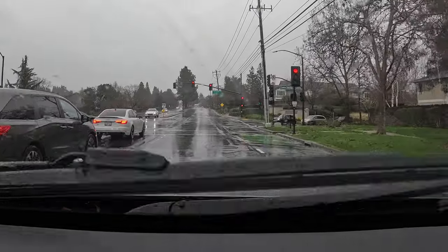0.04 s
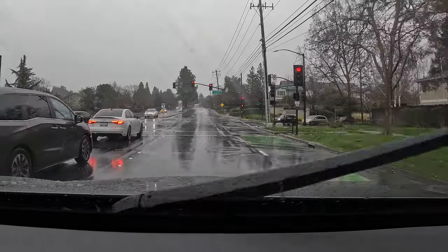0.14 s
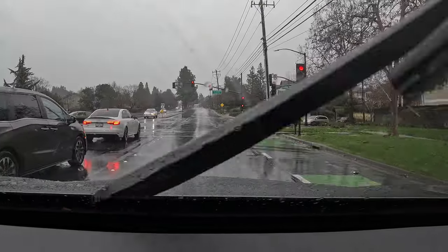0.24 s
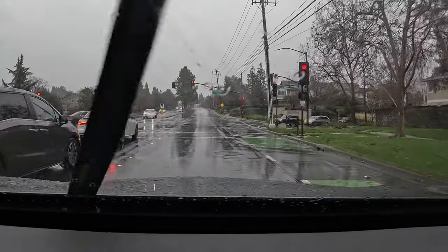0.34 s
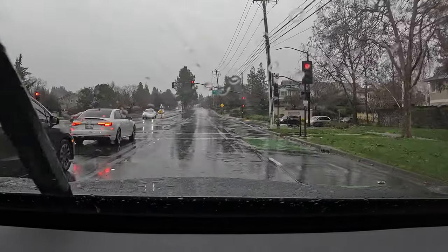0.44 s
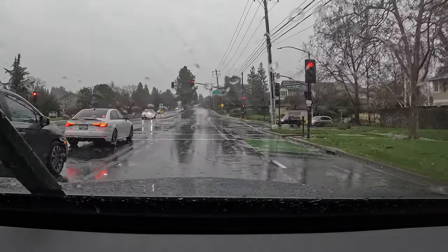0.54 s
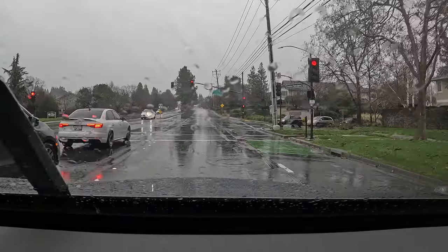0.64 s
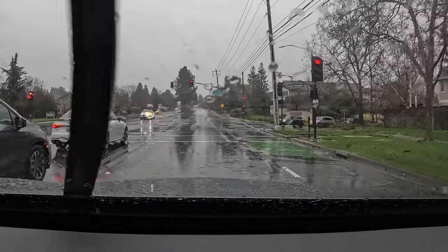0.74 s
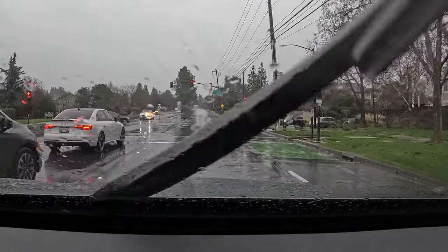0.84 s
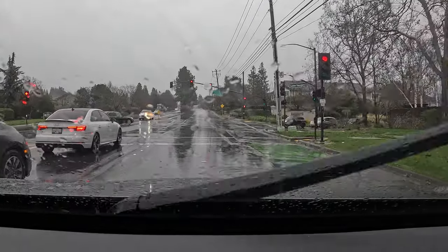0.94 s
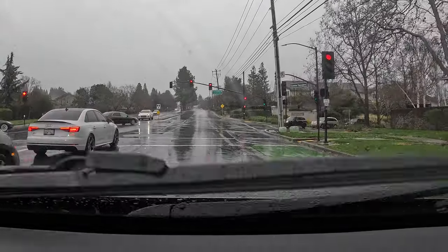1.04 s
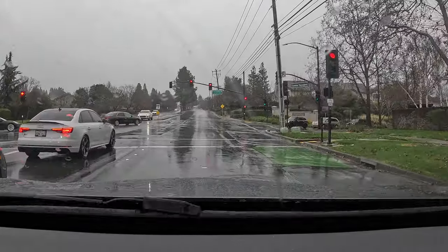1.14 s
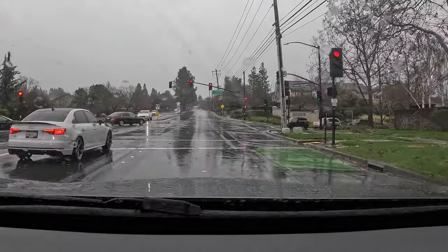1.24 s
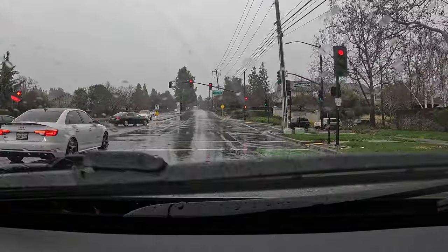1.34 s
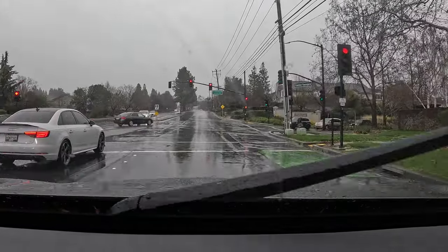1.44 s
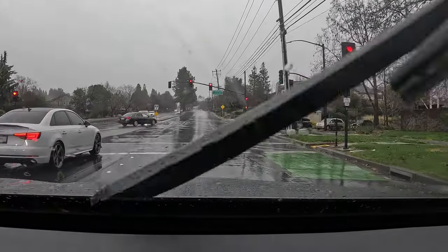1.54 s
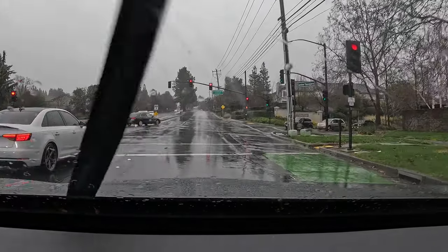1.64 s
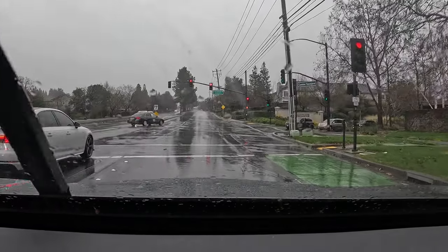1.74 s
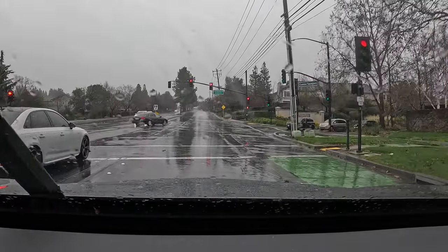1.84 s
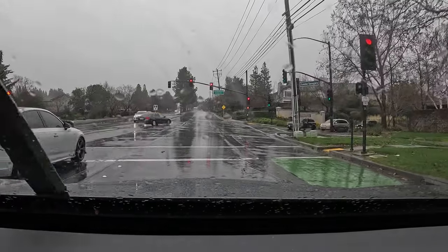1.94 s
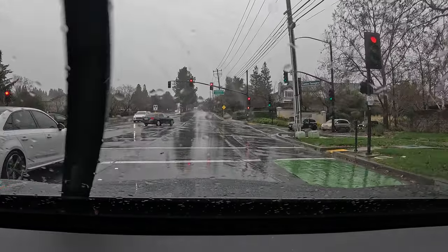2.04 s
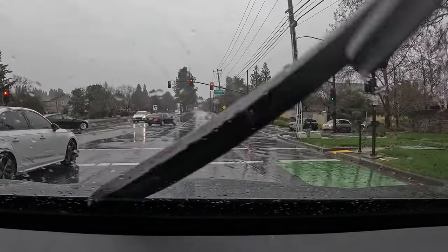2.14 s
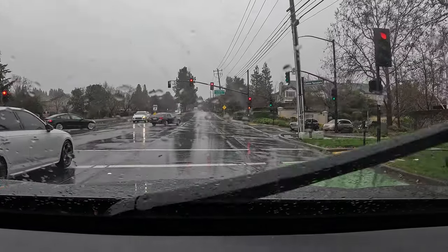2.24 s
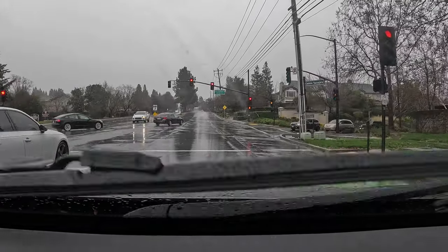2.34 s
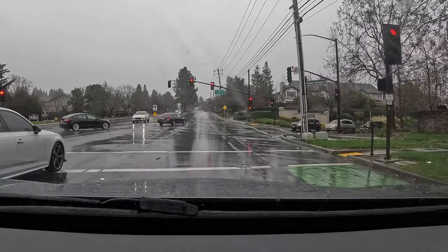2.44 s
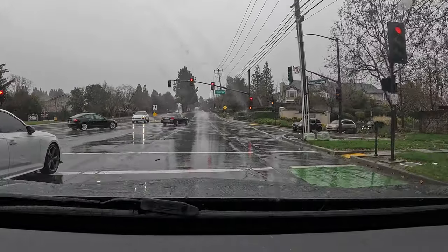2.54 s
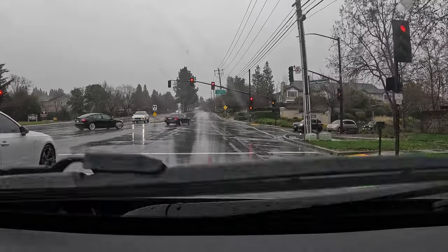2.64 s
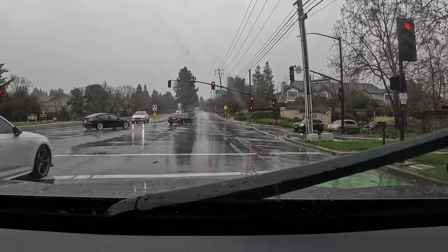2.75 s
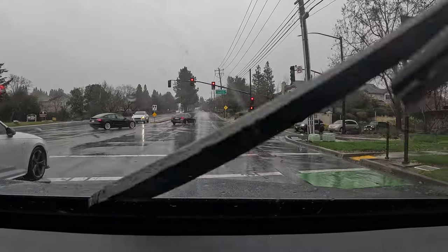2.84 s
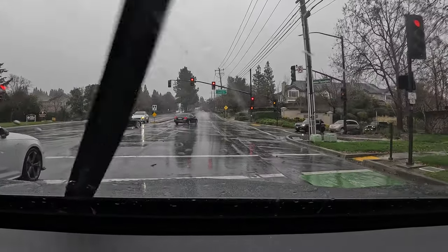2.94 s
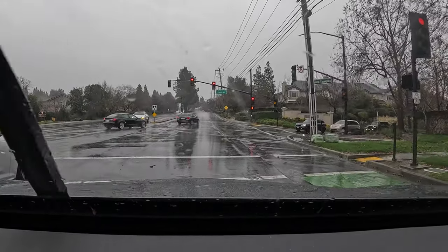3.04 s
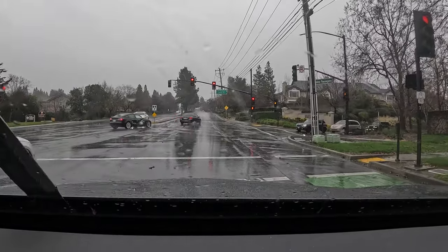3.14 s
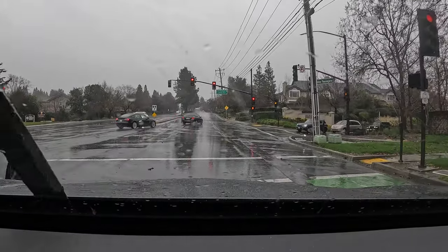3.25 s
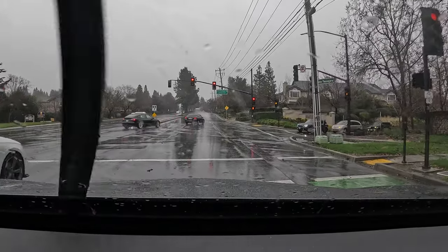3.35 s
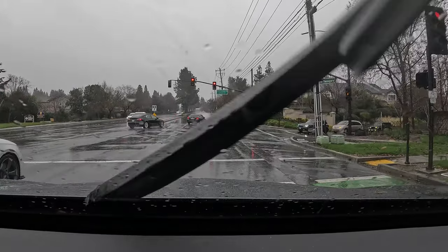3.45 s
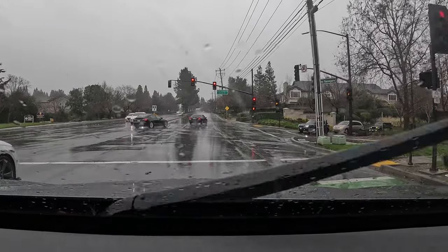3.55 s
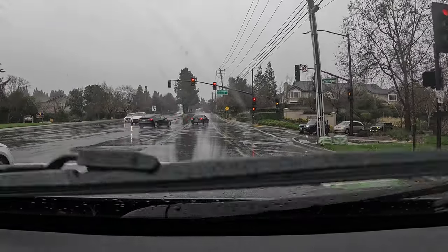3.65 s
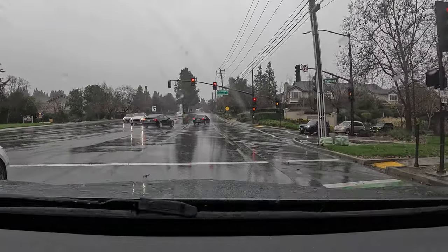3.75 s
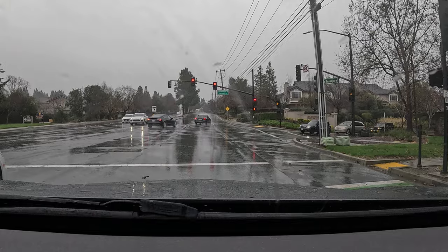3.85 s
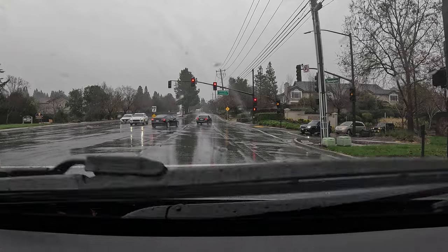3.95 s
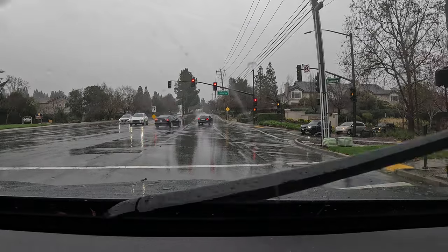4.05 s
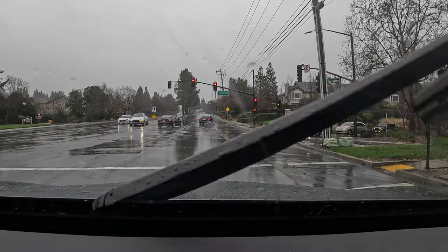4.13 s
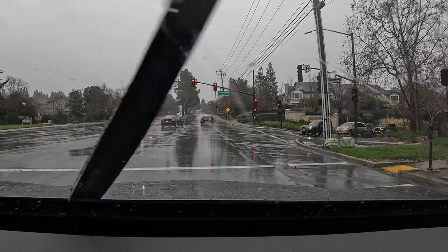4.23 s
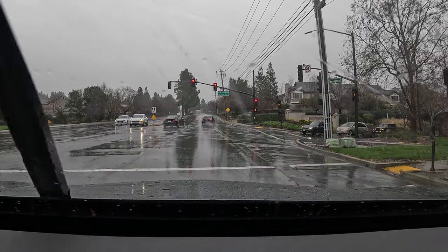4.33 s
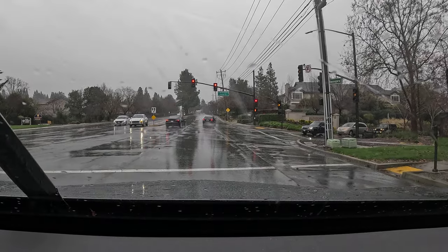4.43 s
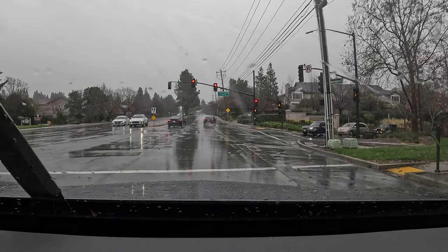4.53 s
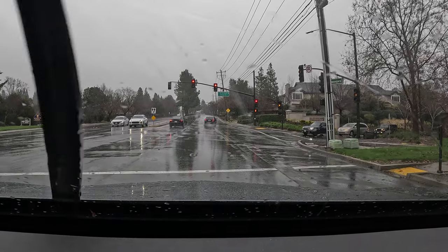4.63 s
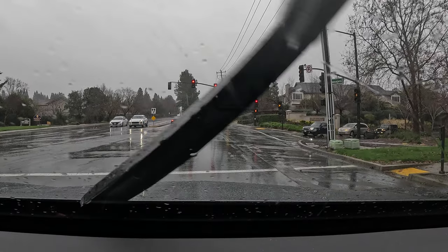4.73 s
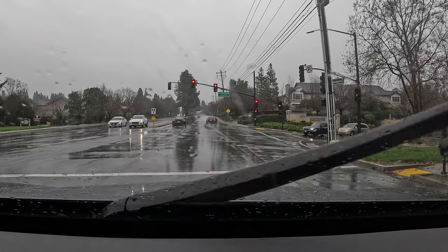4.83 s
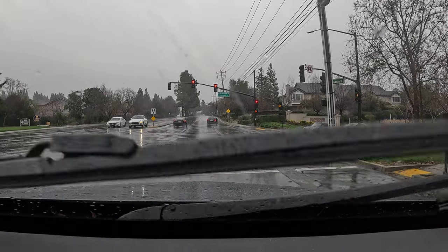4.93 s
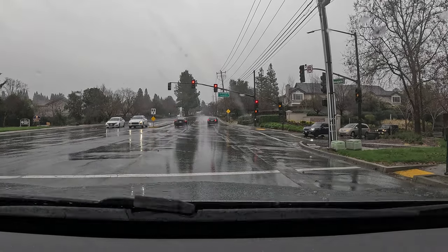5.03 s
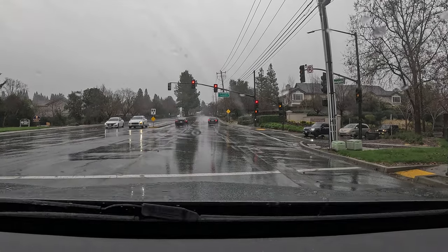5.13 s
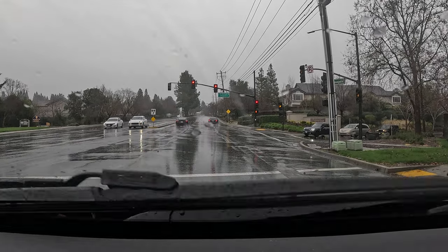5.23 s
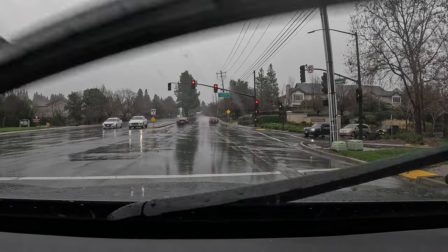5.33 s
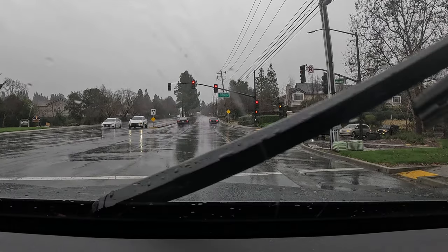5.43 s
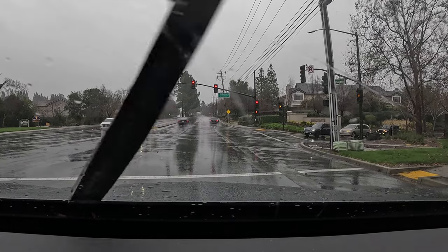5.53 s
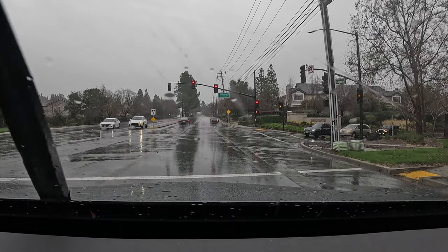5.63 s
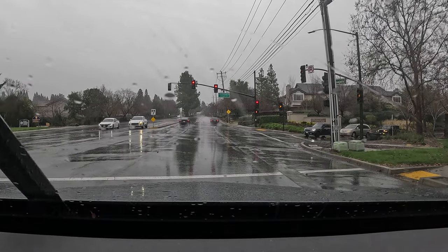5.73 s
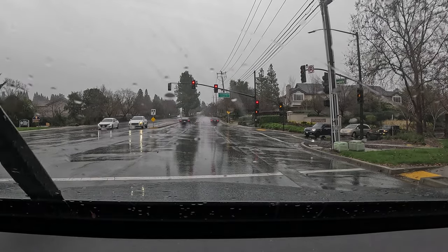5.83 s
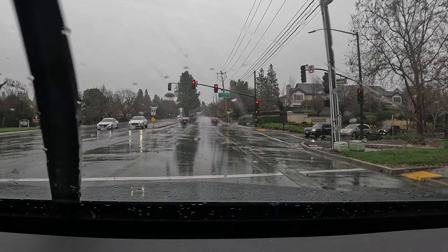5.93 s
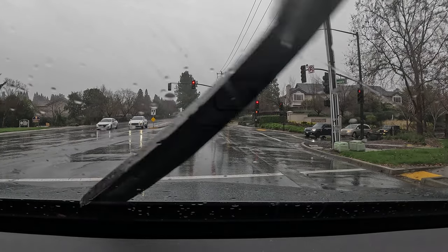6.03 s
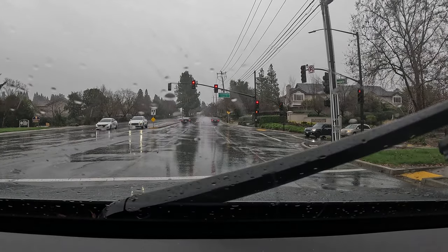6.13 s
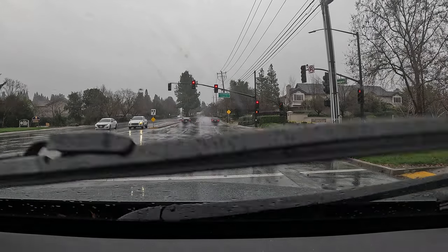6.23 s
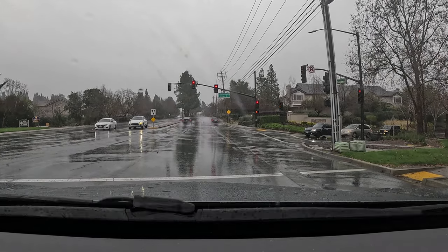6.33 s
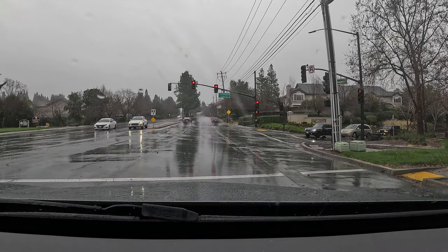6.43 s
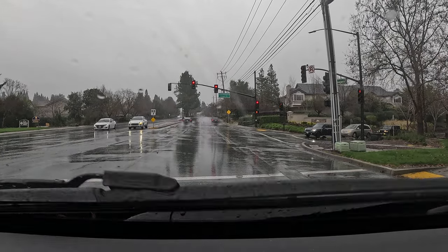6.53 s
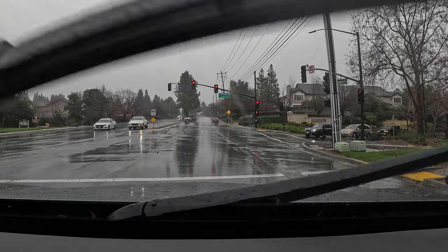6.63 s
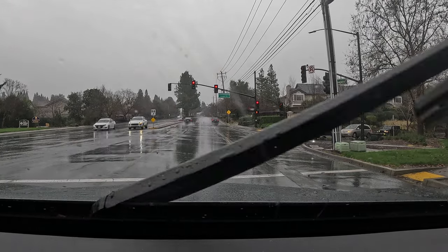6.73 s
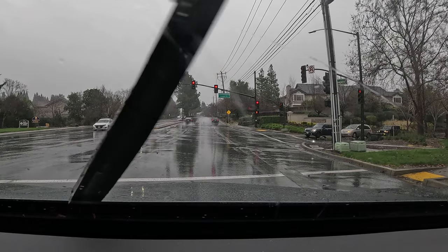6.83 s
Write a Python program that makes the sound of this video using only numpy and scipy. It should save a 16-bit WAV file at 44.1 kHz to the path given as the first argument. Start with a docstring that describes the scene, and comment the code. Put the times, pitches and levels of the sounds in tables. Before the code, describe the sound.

A microphone inside a car rolling to a halt at a wet crossing picks up constant bassy rumble, wavering engine drone and quiet rain on roof and glass. Wiper blades judder and slap over, arms thump through the body, and small linkage ticks fall between. Early on, water splashes the glass and cars swish by; later the road bumps cease, but wipers and rain continue.

```python
"""Inside a car rolling towards a stop at a wet crossing: road noise, engine boom and patter of rain run on
as shaped noise and a throb; early on, two cars hiss past and a splash bursts on the glass.
At each top turn the blades judder by stick-slip and flip over, then the arms thud through the body and hit
their stop; the bottom turn is softer. Linkage and frame tick as struck modes; noise bursts make the splashes
and a faint high rustle near 2.7 s. Bumps swing the cabin air until about 4 s; wipers and rain go on."""
import sys
import numpy as np
from scipy import signal
from scipy.fft import rfft, irfft, next_fast_len
from scipy.io import wavfile

SR = 44100
rng = np.random.default_rng(int(sys.argv[2]) if len(sys.argv) > 2 else 0)


def store_wav(level_fs):
    """Save 16-bit WAV to argv[1]."""
    pcm = np.round(np.clip(np.atleast_2d(level_fs), -1, 1) * 32767)
    wavfile.write(sys.argv[1], SR, pcm.T.astype(np.int16))


def field_ratio(decibels):
    """Amplitude ratio for a level in dB (20 dB per decade); scalars and array-likes work."""
    return 10 ** (np.asarray(decibels, dtype=float) / 20)


N = 303408

# levels of the steady noises along the drive: t/s, road/dB, rain/dB, distant tyre hiss/dB
DRIVE_LEVELS = [(0, -32.5, -49.5, -64), (.5, -32.5, -48, -60.5), (1.1, -30, -46.5, -63),
                (1.7, -34, -49, -61.5), (2.3, -32, -49, -68.5), (3.0, -35.5, -49.5, -64),
                (3.7, -34.5, -49.5, -67.5), (4.3, -35.5, -49, -65.5), (5.0, -34.5, -49.5, -69.5),
                (5.6, -36, -48.5, -68.5), (6.2, -34.5, -49.5, -74), (6.88, -36.5, -49, -66)]


def rms_one(x):
    """Normalisation to unit root-mean-square."""
    return x / np.sqrt(np.mean(x ** 2) + 1e-20)


def drift(corner_hz):
    """Slow random modulation of unit spread: white noise through a double real pole."""
    pole = np.exp(-80 * np.pi * corner_hz / SR)   # computed at every 40th sample
    noise = rng.standard_normal(N // 40 + 2002)
    slow = signal.lfilter([1], [1, -2 * pole, pole * pole], noise)[2000:]
    return np.interp(np.arange(N) / 40, np.arange(len(slow)), rms_one(slow))


def in_time(rows):
    """Linear interpolation of each column over time, sample by sample."""
    s, *columns = np.transpose(rows)
    return [np.interp(np.arange(N) / SR, s, column) for column in columns]


def clicks_at(times, levels_db):
    """Impulsive excitation: one sample per event."""
    clicks = np.zeros(N)
    clicks[np.round(np.array(times) * SR).astype(int)] = field_ratio(levels_db)
    return clicks


def lowpass(x, hz):
    """Second-order Butterworth roll-off above the corner."""
    return signal.sosfilt(signal.butter(2, hz, fs=SR, output="sos"), x)


def bandpass(x, hz, order=2):
    """Butterworth transmission of one frequency band."""
    return signal.sosfilt(signal.butter(order, hz, "band", fs=SR, output="sos"), x)


def noise_bursts(clicks, t60):
    """Exponential decay: each click starts a dying burst of noise."""
    envelope = signal.lfilter([1], [1, -field_ratio(-60 / (t60 * SR))], clicks + 1e-18)
    return envelope * rng.standard_normal(N)


def ring(excitation, modes):
    """Modal resonance: the excitation sets a sum of decaying sines ringing."""
    out = 0
    for hz, level_db, t60 in modes:
        r, w = field_ratio(-60 / (t60 * SR)), 2 * np.pi * hz / SR
        gain = field_ratio(level_db) * np.sin(w)
        out = out + signal.lfilter([0, gain], [1, -2 * r * np.cos(w), r * r], excitation + 1e-18)
    return out


def coloured(spectrum, patchy_db, corner_hz, grain_db=0.0):
    """Spectral shaping of random grains; half-octave bands flicker jointly and singly; rms 1."""
    table_hz, table_db = np.transpose(spectrum)
    size = next_fast_len(N)
    hz = np.maximum(np.arange(size // 2 + 1) * SR / size, 1)
    grains = rng.standard_normal(size) * field_ratio(grain_db * rng.exponential(1, size))
    shaped = rfft(grains) * field_ratio(np.interp(np.log(hz), np.log(table_hz), table_db))
    octave, together, out = np.log2(hz), drift(corner_hz), 0
    for centre in np.arange(np.log2(table_hz[0]), np.log2(table_hz[-1]) + .5, .5):
        share = np.clip(1 - 2 * np.abs(octave - centre), 0, 1)   # overlapping triangular bands
        flicker = field_ratio(patchy_db * (together + drift(corner_hz)))
        out = out + irfft(shaped * share, size)[:N] * flicker
    return rms_one(out)


def stick_slip(turns, runs, slip_s, first_snap_db):
    """Stick-slip friction: nearly even slips, each a push on the shell and a snap on the glass."""
    push, snap = np.zeros((2, N))
    for s, force_db, bright_db, late_db in turns:
        for after, push_db, snap_db, rise, decay, uneven in runs:
            chance = rng.standard_normal((16, 3))   # columns: interval, push, snap
            later = np.cumsum(slip_s * np.exp(uneven * chance[:, 0]))
            later = later - later[0]
            size = np.minimum(0.65 + later / rise, 1) * np.exp(-(later / decay) ** 2)
            # the weight acts in proportion to the delay of the run, fully on the last
            size = size * field_ratio(late_db * after / runs[-1][0])
            at = np.minimum((s + after + later) * SR, N - 1).astype(int)
            push[at] += size * field_ratio(force_db + push_db + 1.0 * chance[:, 1])
            opening_db = first_snap_db * (later == 0)
            snap[at] += size * field_ratio(opening_db + bright_db + snap_db + 1.7 * chance[:, 2])
    return push, snap


def edge_slaps():
    """Impact excitation: the blade edge slaps the glass as it goes over."""
    # slaps: t/s, level ahead of the band filter/dB
    slap_rows = [(0.5764, -45), (.6181, -49), (.638, -50), (1.8787, -41), (1.9022, -46), (1.953, -44),
                 (3.179, -53), (3.1883, -41), (3.2446, -47), (4.4808, -44), (4.5017, -42), (4.5423, -40),
                 (5.7825, -50.5), (5.7903, -52), (5.8448, -46.5)]
    return bandpass(clicks_at(*np.transpose(slap_rows)) + 1e-18, (600, 2200))


def wipers():
    """Stick-slip driving resonators: pushes ring the body shell, scuffs and slaps ring the glass."""
    # top turns: t/s, force/dB, brightness/dB, weight on the last run/dB
    top_turns = [(0.5771, -3, -1.5, 1.5), (1.8781, 1, 1.5, -2), (3.1790, 3.5, 3, -3.5),
                 (4.4805, -0.5, -1, 1.5), (5.7822, 3.5, 2, -3)]
    # arms thudding after each top turn: force/dB, brightness/dB, weight on the last run/dB
    arm_weights = [(0, 1, -3), (1, 3, -1), (0, 3.5, 2), (-1, 4.5, 2), (-1.5, 3, 2.5)]
    # bottom turns: t/s, force/dB, brightness/dB, weight on the last run/dB
    bottom_turns = [(1.282, 0.5, -1.5, -1.5), (2.60, -1, -2.5, -1.5), (3.884, -2, 0.5, -1),
                    (5.20, -0.5, -0.5, 0), (6.487, 0, 1, -4)]
    # runs of slips in a turn: delay t/s, push/dB, snap/dB, growth scale t/s (size 0.65 + t/scale, at most 1),
    # Gaussian decay t/s, spread of the log interval
    flip_runs = [(-.02, -33.5, -76.5, .01, 0.024, 0.2), (0, -27, -60, .001, 0.033, 0.05),
                 (.020, -23, -62.5, .008, 0.039, 0.2), (.062, -20.5, -58.5, .006, 0.021, .1)]
    thud_runs = [(-.05, -32.5, -73.5, .01, 0.03, 0.12), (-.003, -26.5, -66.5, .02, 0.03, 0.038),
                 (.024, -19, -72, .001, .003, 0.04), (.032, -29, -84, .01, 0.052, 0.073)]
    bottom_runs = [(0, -30, -67.5, 0.01, 0.028, 0.16), (.04, -27.5, -69.5, 0.015, 0.029, 0.11),
                   (0.074, -29, -72.5, .01, 0.025, 0.1), (.125, -37, -77, .005, 0.027, 0.13)]
    # modes of the body shell: f/Hz, level/dB, t60/s
    shell_modes = [(107, 0, 0.17), (138.2, 1.5, 0.18), (203.8, 4.5, 0.051), (237, -6, 0.031),
                   (301.8, -6, 0.13), (400, -13, 0.11)]
    # modes of glass and arms: f/Hz, level/dB, t60/s
    glass_modes = [(468, 12.5, 0.013), (618, 6.5, 0.052), (789, 5.5, 0.049), (970, 2, 0.011),
                   (1193, -5, 0.042), (1346, -7, 0.026), (1450, -19, 0.0083), (1900, -23, 0.019),
                   (2600, -13, 0.019), (3230, -17, 0.017)]
    thud_after_s = .1435
    thuds = [(turn[0] + thud_after_s, *arm) for turn, arm in zip(top_turns, arm_weights)]
    # turns, runs, band reaching the shell/Hz, typical slip interval/s, extra snap of a run's first slip/dB
    # a light blade flips quickly, the heavy arms load the shell slowly
    motions = [(top_turns, flip_runs, (140.4, 330), .0082, 3),
               (thuds, thud_runs, (35, 327), .0079, 0),
               (bottom_turns, bottom_runs, (106, 268), .0076, 0)]
    shell_force, snaps = 0, 0
    for turns, runs, band_hz, slip_s, first_snap_db in motions:
        push, snap = stick_slip(turns, runs, slip_s, first_snap_db)
        shell_force = shell_force + bandpass(push + 1e-18, band_hz)
        snaps = snaps + snap
    scuff = lowpass(noise_bursts(.35 * snaps, 0.049), 3000)
    # part of the scuff reaches the cabin dully, without ringing
    direct = field_ratio(28.0) * bandpass(scuff, (250, 1100), order=1)
    return ring(shell_force, shell_modes) + ring(scuff + edge_slaps(), glass_modes) + direct


def stops():
    """Impulsive air displacement: the arms hit their stop, a rounded suck of air after a dull clack."""
    # blows: t/s, blow ahead of the high-pass/dB, clack ahead of its band filter/dB
    stop_rows = [(0.7427, -11, -48), (2.047, -16, -51.5), (3.3462, -15, -45.5), (4.648, -16, -51.5),
                 (5.951, -15.5, -47.5)]
    s, blow_db, clack_db = np.transpose(stop_rows)
    blow_s, clack_before_s = 0.0056, .012
    blow = -np.convolve(clicks_at(s, blow_db), np.hanning(int(blow_s * SR)))[:N]
    blow = signal.sosfilt(signal.butter(1, 60, "high", fs=SR, output="sos"), blow)
    clack = noise_bursts(clicks_at(s - clack_before_s, clack_db), 0.052)
    return blow + bandpass(clack, (700, 3400))


def frame_ticks():
    """Modal excitation: each tick strikes the short blade-frame modes with strengths of its own."""
    # ticks: t/s, strike/dB
    tick_rows = [(.5912, -56), (.636, -54.5), (1.879, -57.5), (1.944, -56.5), (3.201, -59.5), (3.206, -58),
                 (3.211, -54.5), (3.245, -50.5), (4.5027, -58), (4.542, -53.5), (5.804, -61.5),
                 (5.8442, -58.5)]
    # frame modes: f/Hz, level/dB, t60/s
    frame_modes = [(4640, -4, .012), (5220, -1, 0.009), (6100, -5.5, 0.0074)]
    s, strike_db = np.transpose(tick_rows)
    out, chance = 0, rng.standard_normal((len(s), len(frame_modes)))
    for k, mode in enumerate(frame_modes):
        out = out + ring(clicks_at(s, strike_db + 1.5 * chance[:, k]), [mode])
    return out


def linkage_ticks():
    """Impact with rebound: play in the linkage is taken up, ringing small metal modes."""
    # ticks: t/s, lower mode strike/dB, upper mode strike/dB, rebound strike/dB
    tick_rows = [(0.287, -57, -59, -56), (1.5925, -50.5, -51.5, -53), (2.573, -57, -52.5, -55),
                 (2.8958, -54, -55, -58), (3.883, -60, -50, -58), (4.201, -53, -54, -56),
                 (5.182, -58, -54, -59), (5.502, -54, -52, -54.5), (6.493, -60, -51, -64),
                 (6.8043, -54, -56, -56)]
    # lower, upper and rebound modes: f/Hz, level/dB, t60/s
    link_modes = [(2380, 7, 0.02), (2950, 7, 0.018), (2650, 8, .02)]
    s, *strikes_db = np.transpose(tick_rows)
    rebound_s, contact_t60_s = 0.011, .0005
    out = 0
    for mode, strike_db, after in zip(link_modes, strikes_db, (0, 0, rebound_s)):
        out = out + ring(clicks_at(s + after, strike_db), [mode])
    contact = field_ratio(-60 / (contact_t60_s * SR))   # brief contact softens the strike
    return signal.lfilter([1 - contact], [1, -contact], out)


def splashes_and_rustle():
    """Band-limited noise bursts: splashes on the glass, a faint high rustle, water thrown by the blades."""
    # splashes, and the faint high rustle near 2.7 s:
    # t/s, level ahead of the band filter/dB, centre f/Hz, bandwidth/octaves, t60/s
    burst_rows = [(.238, -39, 4330, 0.64, 0.099), (0.241, -60, 10200, 0.53, 0.066),
                  (2.672, -62.5, 10700, 1.2, 0.054), (2.70, -65, 11070, 0.92, 0.13),
                  (2.733, -62, 10140, 1.5, 0.053), (2.839, -65.5, 10800, 0.64, 0.086),
                  (3.078, -53, 7620, 0.39, 0.051), (4.187, -63, 7300, 0.97, 0.035),
                  (5.582, -67, 6500, 1.1, .03)]
    # water thrown by the flipping blades: t/s, level ahead of the band filter/dB
    fling_rows = [(.635, -54), (1.877, -51), (1.944, -56), (3.200, -56), (3.244, -53), (4.501, -59),
                  (4.5416, -55), (5.843, -58.5)]
    flung = [(*row, 5100, .8, 0.07) for row in fling_rows]   # centre Hz, octaves, t60 s
    out, t = np.zeros(N), np.arange(6000) / SR
    for s, level_db, hz, octaves, t60 in burst_rows + flung:
        envelope = field_ratio(-60 * t / t60) * np.minimum(t / (0.17 * t60), 1)
        band_hz = hz * 2 ** (np.array([-.5, .5]) * octaves)
        burst = bandpass(rng.standard_normal(len(t)) * envelope, band_hz)
        out[round(s * SR):][:len(t)] += field_ratio(level_db) * burst
    return out


def small_drops():
    """Random arrivals: small drops fall as faint bright ticks of uneven size."""
    per_s, level_db, spread_db = 18, -74, 3.0   # level ahead of the band filter
    hits = (rng.random(N) < per_s / SR) * field_ratio(level_db + spread_db * rng.standard_normal(N))
    return bandpass(noise_bursts(hits, 0.027), (5500, 9500), order=4)


def bumps():
    """Damped resonance: a soft blow through the springs swings the cabin air a few times."""
    # wheels crossing a bump: t/s, blow/dB
    bump_rows = [(1.106, -12.5), (1.363, -19), (1.577, -14.5), (1.869, -12.5), (2.428, -18), (2.877, -13),
                 (3.061, -19), (4.043, -14)]
    # cabin air: f/Hz, level/dB, t60/s
    air_mode = [(39.4, 3, 0.089)]
    return lowpass(ring(clicks_at(*np.transpose(bump_rows)), air_mode), 90)


def boom():
    """Forced cabin resonance: an unsteady two-order engine throb with noise shaken up by the road."""
    # overall boom: t/s, level/dB
    boom_levels = [(0, -34.5), (.2, -33), (.45, -25), (1.0, -28.5), (1.8, -33.5), (2.1, -29.5),
                   (2.75, -27.5), (3.3, -31), (4.1, -32), (4.9, -34), (5.5, -30.5), (5.75, -33),
                   (6.2, -37.5), (6.88, -32.5)]
    # throb: t/s, mean first-order f/Hz, first order/dB, second order/dB (both relative to the boom)
    throb_rows = [(0, 27.44, -12.5, 4), (1.0, 26.4, 0, -8.5), (2.0, 26.89, -10.5, 3.5),
                  (2.25, 40.46, -5, -6.5), (3.1, 38.73, 0, -5), (3.4, 33.76, 4, -17.5), (5.0, 34, 0.5, -19),
                  (6.88, 36, 0, -2.5)]
    # road shake spectrum: f/Hz, relative level per Hz/dB
    shake_spectrum = [(11, -34.5), (18, -8), (38, -1.5), (80, -10.5), (100, -32.5), (180, -120)]
    hz, first_db, second_db = in_time(throb_rows)
    angle = 2 * np.pi * np.cumsum(hz * np.exp(0.1395 * drift(7.9))) / SR
    throb = field_ratio(first_db) * np.sin(angle) + field_ratio(second_db) * np.sin(2 * angle)
    shake = field_ratio(-1.0) * coloured(shake_spectrum, patchy_db=0.1, corner_hz=2.8)
    level_db = in_time(boom_levels)[0] - drift(8.1)   # wavers with a spread of 1 dB
    return field_ratio(level_db) * (throb + shake)


def road():
    """Broadband structure-borne rumble: low shaped noise, easing unevenly along the drive."""
    # rumble spectrum: f/Hz, relative level per Hz/dB
    road_spectrum = [(44, -48), (75, -8), (102, -1.5), (162, -6.5), (194, -4.5), (227, -15.5), (302, -14),
                     (380, -26.5), (490, -44), (840, -120)]
    return field_ratio(in_time(DRIVE_LEVELS)[0]) * coloured(road_spectrum, patchy_db=0.0, corner_hz=5.6)


def rain():
    """Superposed impacts: dense grains of uneven size patter on roof and glass."""
    # patter spectrum: f/Hz, relative level per Hz/dB
    rain_spectrum = [(290, -16), (350, -2.5), (430, 0.5), (510, -6), (600, -3), (660, -7.5), (800, -6.5),
                     (945, -14), (1200, -16.5), (1580, -18.5), (1910, -26), (2400, -25), (3030, -22.5),
                     (3700, -29), (4500, -37.5), (7000, -56), (11000, -73.5)]
    patter = coloured(rain_spectrum, patchy_db=0.5, corner_hz=20.0, grain_db=1.0)
    return field_ratio(in_time(DRIVE_LEVELS)[1]) * patter


def passing_cars():
    """Level rise at closest approach: water hisses under the tyres of passing cars."""
    # passes: closest t/s, level there/dB, half width at half amplitude t/s
    pass_rows = [(0.30, -63, 0.15), (1.25, -59, .15)]
    # swish spectrum: f/Hz, relative level per Hz/dB
    swish_spectrum = [(1200, -21.5), (2000, -7.5), (3100, -1), (4300, -11), (6000, -17), (9000, -24),
                      (12000, -36.5)]
    t, power = np.arange(N) / SR, 0
    for s, near_db, half_width in pass_rows:
        power = power + field_ratio(near_db) ** 2 / (1 + ((t - s) / half_width) ** 2) ** 2
    return np.sqrt(power) * coloured(swish_spectrum, patchy_db=0.5, corner_hz=10.0, grain_db=-2.0)


def distant_hiss():
    """Broadband turbulence: flickering bright noise from distant tyres on the wet road."""
    # spray spectrum: f/Hz, relative level per Hz/dB
    spray_spectrum = [(900, -17), (1500, -6.5), (3000, -6.5), (4500, -14), (6500, -21.5), (8000, -28),
                      (9500, -27.5), (11500, -38.5), (14000, -47.5)]
    spray = coloured(spray_spectrum, patchy_db=1.0, corner_hz=6.2, grain_db=0.5)
    return field_ratio(in_time(DRIVE_LEVELS)[2]) * spray


def scene():
    """Linear superposition of all sources in one channel."""
    wiper_sounds = wipers() + stops() + frame_ticks() + linkage_ticks()
    bright_sounds = splashes_and_rustle() + small_drops() + rain() + passing_cars() + distant_hiss()
    driving = bumps() + boom() + road()
    return (wiper_sounds + bright_sounds + driving)[None]


def top_cut(x):
    """Nothing passes above the cut-off."""
    return signal.sosfilt(signal.butter(12, 13800, fs=SR, output="sos"), x)


def record(dry):
    """High-pass response of the microphone, which drops the lowest bass."""
    heard = signal.sosfilt(signal.butter(2, 14, "high", fs=SR, output="sos"), dry)
    return top_cut(heard)


dry = scene()
out = record(dry)
store_wav(out)
```